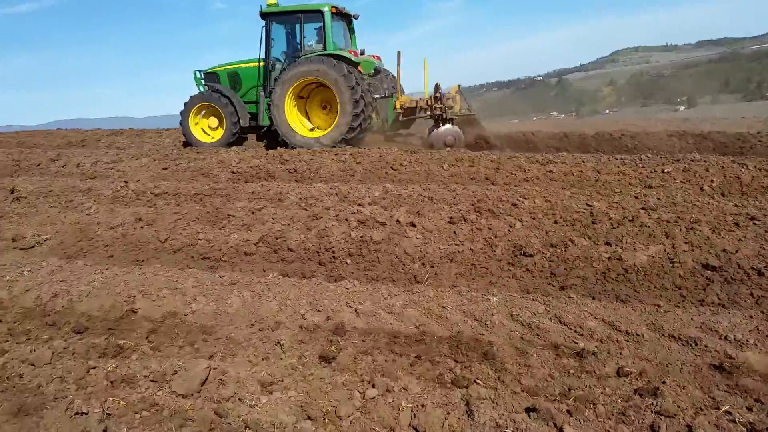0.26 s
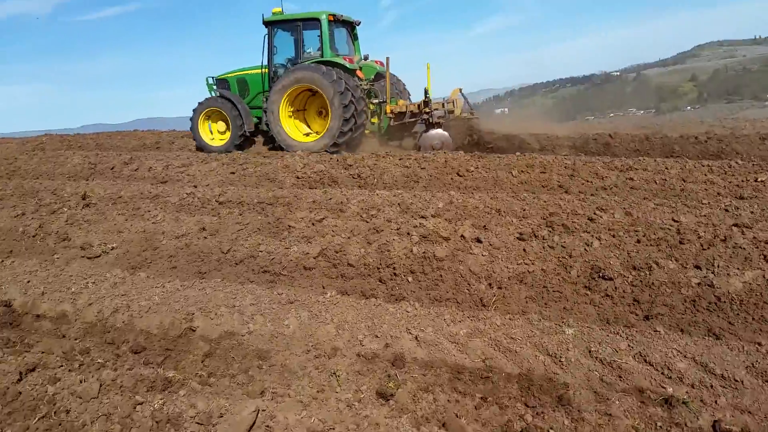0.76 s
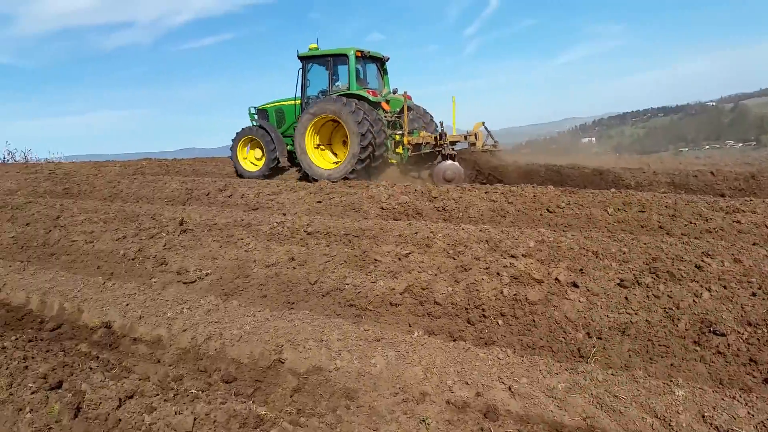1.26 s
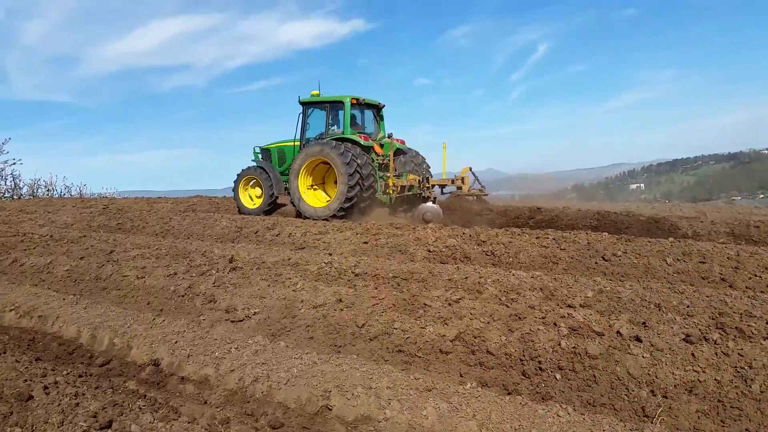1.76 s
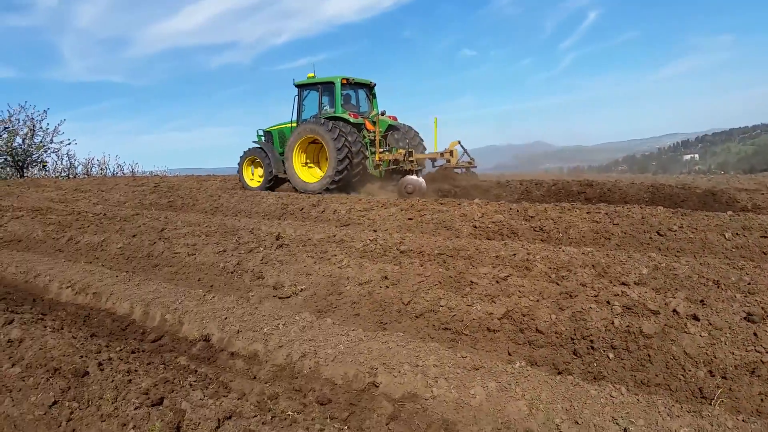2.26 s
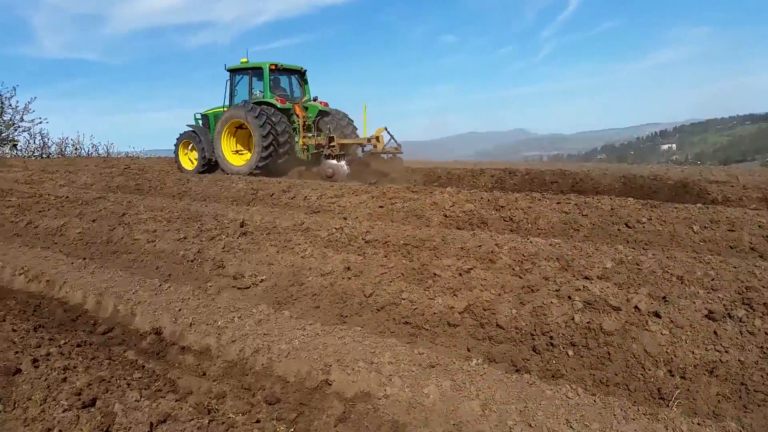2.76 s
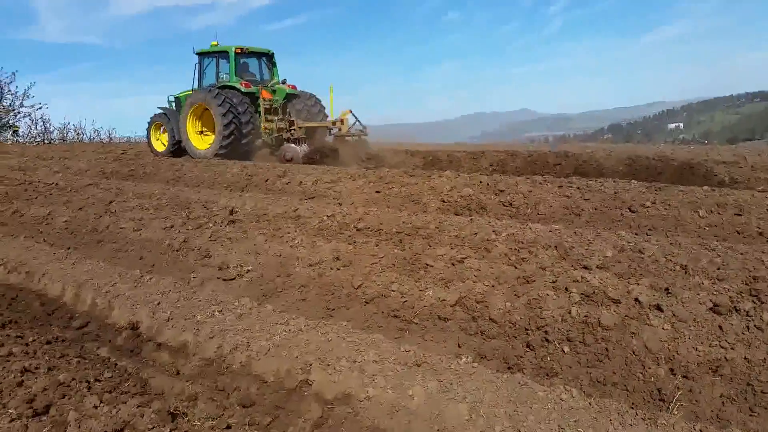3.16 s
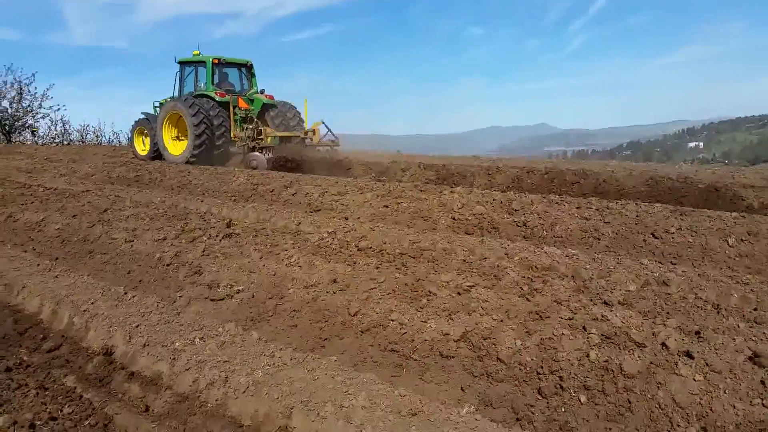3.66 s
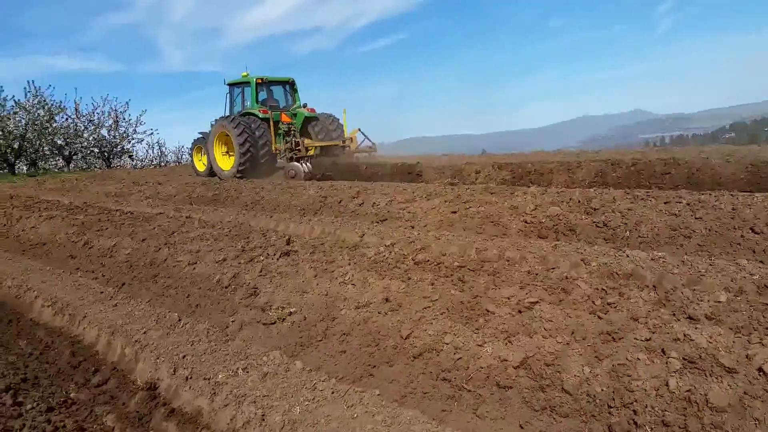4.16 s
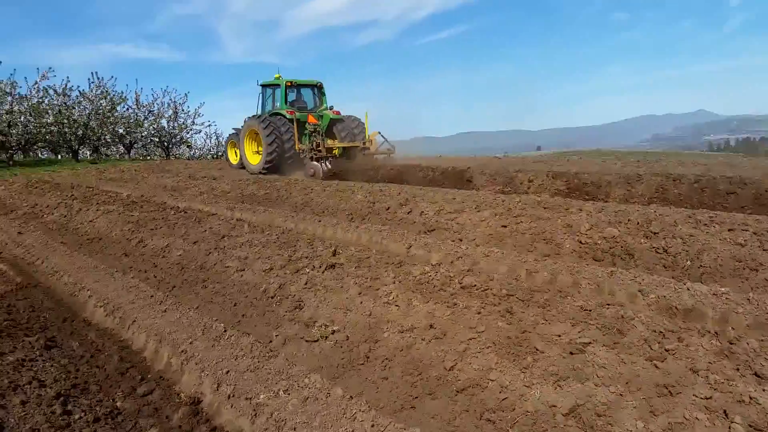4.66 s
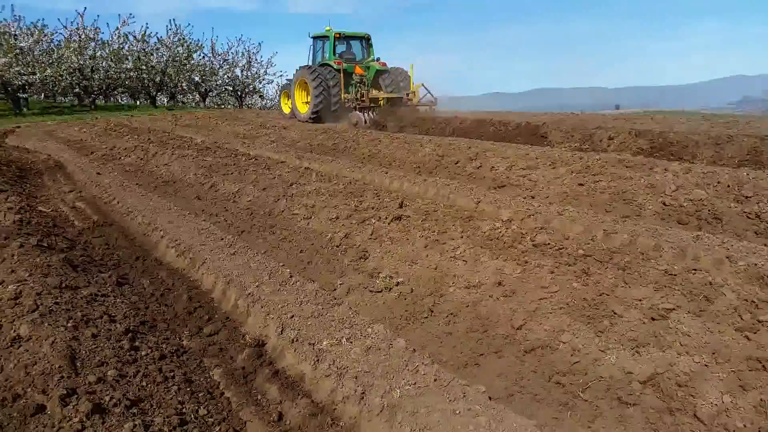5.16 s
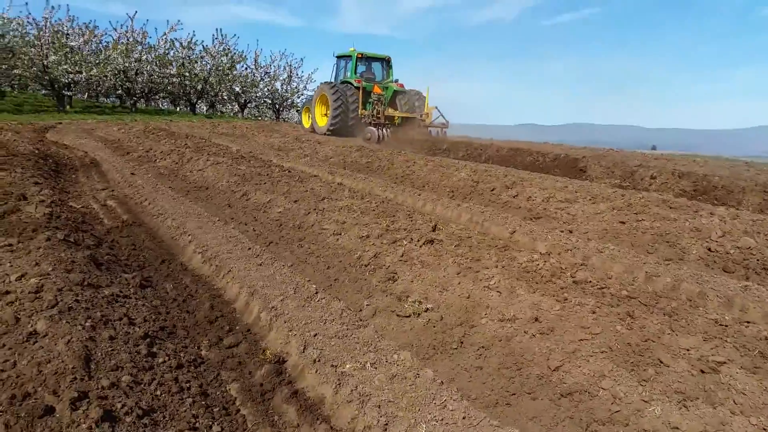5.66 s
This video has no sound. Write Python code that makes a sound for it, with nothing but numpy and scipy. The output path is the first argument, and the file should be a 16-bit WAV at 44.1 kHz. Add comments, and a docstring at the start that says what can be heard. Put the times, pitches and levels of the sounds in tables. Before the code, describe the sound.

Outdoors in an open field, a four-cylinder diesel tractor works steadily, its low exhaust drone pulsing about seventy times a second. Rumble, rough roar and harrow clatter surround it. Gritty knocks of discs on clods or stones cluster between one and three seconds. The stereo microphone stays at a moderate distance as the tractor draws away, growing quieter and duller, its hiss nearly gone.

```python
"""Diesel tractor with a disc harrow

A four-cylinder diesel tractor drags a disc harrow across a field and draws away from a two-port microphone.
Sinusoidal exhaust orders and a gliding hum sound with shaped noise: a low rumble, and roar, clatter and hiss
that throb with each firing. A whistle is a narrow noise band; knocks of a disc on a clod or stone and
bright ticks are short noise bursts, and jolts of the frame are low swells."""
import sys
import numpy as np
from scipy import signal
from scipy.fft import rfft, irfft
from scipy.io import wavfile
from scipy.ndimage import uniform_filter1d

SR = 44100
rng = np.random.default_rng(int(sys.argv[2]) if len(sys.argv) > 2 else 0)


def wav_record(signal):
    """Record a signal, one row per channel, as 16-bit PCM in the file named by sys.argv[1]."""
    frames = np.transpose(np.atleast_2d(signal))
    bounded = np.clip(frames, -1, 1)
    # unit amplitude maps onto the largest positive 16-bit level
    quanta = np.round(bounded * 32767).astype(np.int16)
    wavfile.write(sys.argv[1], SR, quanta)


def magnitude_from_level(level_db):
    """Linear magnitude for a level in decibels (20 dB per decade)."""
    exponent = np.asarray(level_db, float) / 20
    return 10 ** exponent


N = 260631
T = np.arange(N) / SR  # sample times [s]
FRAMES = np.arange(-(-N // 256) + 1) * 256 / SR  # times of the spectral frames [s]
HZ = np.fft.rfftfreq(1024, 1 / SR)  # frequencies of the spectral bins

# Change of level as the machine draws away: (time [s], gain [dB])
AWAY = [(0, -0.5), (.5, -2), (2.1, -3), (3.05, -6), (4.3, -6.5), (4.85, -5), (5.4, -6.5), (5.91, -7)]


def evened(x):
    """Normalization: scales to an rms of 1, judged on the mean of the channels."""
    middle = np.atleast_2d(x).mean(0)
    return x / np.sqrt(np.mean(middle ** 2) + 1e-20)


def curves(rows):
    """Linear interpolation: the columns of a table as curves over time."""
    s, *columns = np.transpose(rows)
    return [np.interp(T, s, c) for c in columns]


def read(points, hz):
    """Interpolation over log frequency: the columns of a table at the frequencies hz."""
    f, *columns = np.transpose(points)
    return np.array([np.interp(np.log(hz + 1), np.log(f + 1), c) for c in columns])


def resonate(x, hz, width):
    """Resonance by heterodyning: shifts hz down to zero, smooths and shifts back, with a peak gain of 1."""
    turn = np.exp(2j * np.pi * np.cumsum(hz * np.ones(N)) / SR)
    r = np.exp(-np.pi * width / SR)
    smooth = signal.lfilter([1 - r], [1, -r], x / turn)
    return 2 * (turn * smooth).real


def at_ports(pair, colour, patchy_db=0, shape_db=0):
    """Interaural coherence: two signals become a partly alike pair, coloured port by port with drifting patches."""
    # Likeness of the two ports: (frequency [Hz], likeness [0-1], phase by which the left port leads [rad])
    ports = [(25, .96, 0), (120, .95, .05), (300, .985, .02), (700, .98, -.16), (880, .84, -.2),
             (1120, .89, .14), (1500, .78, .05), (1900, .58, .7), (2400, .7, 1.05), (3000, .5, 1.8),
             (3650, .45, 2.75), (4400, .5, 3.2), (5300, .2, 4.5), (6500, .35, 5.8), (9600, .1, 8),
             (11600, .22, 10.1), (13000, .35, 10), (15700, .22, 11.6)]
    z = signal.stft(pair, nperseg=1024, noverlap=768)[2]
    same, lead = read(ports, HZ)[:, :, None]
    same = np.clip(same, 0, 1)
    z[1] = (same * z[0] + np.sqrt(1 - same ** 2) * z[1]) * np.exp(-1j * lead)
    patches = rng.standard_normal(z.shape[1:])
    patches = uniform_filter1d(patches, size=3, axis=0)  # narrow in frequency
    patches = uniform_filter1d(patches, size=50, axis=1)  # long in time
    colour_db = read(colour, HZ)[:, :, None]
    z *= magnitude_from_level(colour_db + patchy_db * patches / patches.std() + shape_db)
    return signal.istft(z, nperseg=1024, noverlap=768)[1][:, :N]


def speed():
    """Speed regulation: the governor hunts under load, so the firing rate [Hz] eases between turning points."""
    # Turning points: (time [s], firing rate [Hz])
    turning_points = [(0, 70.), (0.299, 72.12), (.8, 69.48), (1.04, 71.96), (1.349, 67.82), (1.62, 71.2),
                      (1.789, 69.84), (1.95, 71.57), (2.14, 68.8), (2.39, 73.3), (2.65, 69.8),
                      (2.901, 71.6), (3.18, 69.3), (3.37, 71.4), (3.5, 70.37), (4., 70.3), (4.2, 70.9),
                      (4.5, 70.6), (4.72, 70.92), (4.98, 69.86), (5.36, 71.86), (5.65, 71.5), (5.821, 70.4),
                      (5.91, 71.)]
    s, hz = np.transpose(turning_points)
    index = np.arange(len(s))
    place = np.interp(T, s, index)
    eased = place - np.sin(2 * np.pi * place) / (2 * np.pi)
    return np.interp(eased, index, hz)


def puffs(firing, depth_db, lag):
    """Amplitude modulation: noise swells once a firing, more for the strong cylinders."""
    # Strength of the four cylinders in turn [depth_db / 2 times this gives dB]
    cylinders = [1.8, -0.8, 1.8, -1.7]
    strength = np.interp(firing - lag, np.arange(4), cylinders, period=4)
    swell = magnitude_from_level(depth_db * (np.cos(2 * np.pi * (firing - lag)) + strength / 2))
    return swell * rng.standard_normal((2, N))


def exhaust(firing):
    """Fourier series: periodic firing gives orders of its rate, and unequal cylinders add fractional ones."""
    # Exhaust tones as the pipe turns away: (time [s], first order rms [dB], second order rms [dB])
    orders = [(0, -23.5, -22.5), (1., -24, -25), (1.35, -24.8, -24), (2.25, -24.5, -26.5),
              (2.55, -27, -27.5), (3., -27, -32.5), (3.25, -26.5, -37), (3.8, -26.5, -40),
              (4.3, -26, -41.5), (4.55, -26.5, -49.5), (5.05, -26, -36), (5.45, -28, -39), (5.75, -32, -32),
              (5.91, -29, -34)]
    # Weak orders: (time [s], order 1.25 rms [dB], order 5 rms [dB], order 6 rms [dB])
    weak = [(0, -40, -43.5, -67), (0.802, -47, -69, -41), (1.3, -43, -51, -42), (2., -41.5, -54, -49.5),
            (2.8, -43, -48.5, -61), (3.6, -46, -50, -60), (3.95, -50, -45.5, -53), (4.4, -37, -43.5, -58),
            (5.1, -45.5, -51.5, -47), (5.6, -52, -70, -72)]
    # Orders from unequal cylinders: (multiple of the firing rate, level over the first order [dB])
    uneven = [(.5, -34.5), (.75, -34), (1.5, -24.5), (1.75, -23), (2.25, -22.5), (2.5, -24), (4.25, -32.5),
              (7, -30.5), (8, -28)]
    first_db, second_db = curves(orders)
    angle = 2 * np.pi * firing
    tone = magnitude_from_level(first_db) * np.cos(angle) - magnitude_from_level(second_db) * np.sin(2 * angle)
    third = np.cos(3 * angle + 2 * np.pi * rng.random())
    tone += magnitude_from_level(second_db - 13.5) * third  # the third order fades with the second
    for k, db in zip((1.25, 5, 6), curves(weak)):
        tone += magnitude_from_level(db) * np.cos(k * angle + 2 * np.pi * rng.random())
    firing_hz = np.gradient(firing) * SR
    for k, db in uneven:  # these waver, as no two cycles are alike
        wavering = evened(resonate(rng.standard_normal(N), k * firing_hz, 0.73))
        tone += magnitude_from_level(first_db + db) * wavering / np.sqrt(2)
    return np.sqrt(2) * tone  # peak from rms


def hum():
    """Frequency modulation: a sinusoid on its own slow glide, with a phase lead between the ports."""
    # The hum slides against the third order and fades out now and then: (time [s], rms level [dB])
    hum_level = [(0, -26), (.33, -29.5), (.55, -26.5), (1.2, -25.5), (1.8, -25.5), (2.25, -31), (3., -30.5),
                 (3.3, -38), (3.6, -43.5), (3.8, -32.5), (4.2, -29), (4.65, -39), (4.85, -32), (5.05, -35),
                 (5.25, -32), (5.91, -35)]
    # Glide: (time [s], frequency [Hz])
    glide = [(0, 217.6), (1.1, 218), (1.75, 215.5), (2.05, 212.8), (3., 210.6), (5.91, 210.5)]
    # Move to one side: (time [s], phase by which the left port leads [rad])
    hum_lead = [(0, 0.), (2.7, 0), (3.1, 0.18), (5.91, .15)]
    angle = 2 * np.pi * np.cumsum(curves(glide)[0]) / SR
    angle = angle + curves(hum_lead)[0] / 2 * np.array([[1], [-1]])
    return np.sqrt(2) * magnitude_from_level(curves(hum_level)[0]) * np.sin(angle)


def roar(firing):
    """Source and filter: puffs sound broadly and through a body resonance that shifts as the tractor turns away."""
    # Roar spectrum: (frequency [Hz], left level [dB], right level [dB])
    colour = [(204, -20, -26), (273, 0, -0.5), (496, -3, -4), (660, -3, -3.5), (788, -7.5, -9.5),
              (965, -61, -62)]
    # Body resonance: (time [s], level [dB], centre [Hz], width [Hz])
    resonance = [(0, -33.5, 665, 161), (.7, -32.5, 600, 160.4), (1.4, -34.5, 564, 144),
                 (2.1, -44, 575, 148), (2.9, -52.5, 630, 151.5), (3.7, -45, 720, 131), (4.5, -39, 655, 120),
                 (4.9, -42, 630, 125.4), (5.3, -37.5, 640, 100), (5.7, -34, 569, 70),
                 (5.91, -34.5, 564, 60)]
    body_db, hz, width = curves(resonance)
    broad_db = -35 + curves(AWAY)[0]
    broad_db -= 13 * np.maximum(T - 5.47, 0)  # the broad roar sinks at the end, in dB per second
    slip = evened(resonate(rng.standard_normal(N), 0.84, 8.))
    uneven_firing = firing - 0.3 + 0.008 * slip  # firings come a little early or late
    thumps = sum(np.cos(2 * np.pi * k * uneven_firing) for k in range(6, 11))
    drive = puffs(firing, depth_db=1.5, lag=0.27) + 0.045 * thumps
    log_offset = np.log(HZ[:, None] + 1) - np.log(np.interp(FRAMES, T, hz))
    spread = log_offset * np.interp(FRAMES, T, hz / width)
    body_shape_db = np.maximum(-12 * spread ** 2, -60)
    body = at_ports(drive, colour, patchy_db=1.5, shape_db=body_shape_db)
    body *= np.sqrt(150 / width)  # makes up for the smaller power of a narrower band
    broad = at_ports(puffs(firing, depth_db=2.5, lag=0.2), colour, patchy_db=2.0)
    return magnitude_from_level(broad_db) * evened(broad) + magnitude_from_level(body_db) * evened(body)


def rumble():
    """Broadband random excitation: tyres and soil give low noise of unsteady level."""
    # Rumble spectrum: (frequency [Hz], left level [dB], right level [dB])
    colour = [(15, -34.5, -25), (25, -1, 6.5), (45, 1.5, 6.5), (105, 9, 11), (174, 1.5, 7), (257, 3.5, 0),
              (375, -60, -54)]
    low = evened(at_ports(rng.standard_normal((2, N)), colour, patchy_db=3.0))
    low = signal.sosfilt(signal.butter(2, 32., "high", fs=SR, output="sos"), low)  # the deep bass is cut away
    gusts = evened(resonate(rng.standard_normal(N), 3., 9.5))
    return magnitude_from_level(-34 + 0.83 * curves(AWAY)[0] - 0.5 * gusts) * low


def clatter(firing):
    """Frequency-dependent attenuation: throbbing noise of block and discs grows fainter and duller with distance."""
    # Clatter spectrum: (frequency [Hz], left level [dB], right level [dB])
    colour = [(640, -21, -14), (866, -3.5, 1.5), (1000, -2.5, -1), (1570, -4.5, -0.5), (1840, -7, -3.5),
              (2660, -10, -6.5), (3340, -16.5, -10.5), (3930, -11.5, -15.5), (4550, -18.5, -19),
              (5240, -21, -28.5), (6800, -29.5, -50.5), (7900, -39, -57.5), (9600, -50, -56),
              (12000, -67, -57)]
    # Bands that swell for a while:
    # (centre [Hz], width [Hz], peak gain [dB], time of the peak [s], time from the peak to 1/e of the gain [s])
    swells = [(1078, 120, 7, 0.55, .96), (994, 210, 9, 3.53, 0.9), (1080, 120, 4, 5.7, 0.33),
              (1407, 91, 5.5, 2.3, 0.67), (1370, 100, 4.8, 4.3, 1.4), (2054, 88, 3.5, 1.4, 4),
              (2090, 160, 11, 4.68, 0.1), (2780, 230, 4, 0.94, 1.1)]
    away_db = curves(AWAY)[0]
    loss_db = 0.28 * (away_db.mean() - away_db)  # per kHz
    shape_db = -HZ[:, None] / 1000 * np.interp(FRAMES, T, loss_db)
    for hz, width, db, s, lasts in swells:
        rise_and_fall = np.exp(-((FRAMES - s) / lasts) ** 2)
        shape_db += db * rise_and_fall / (1 + (2 * (HZ[:, None] - hz) / width) ** 2)
    noise = puffs(firing, depth_db=0.68, lag=0.33)
    return magnitude_from_level(-36 + away_db) * evened(at_ports(noise, colour, patchy_db=1.68, shape_db=shape_db))


def hiss(firing):
    """Random amplitude modulation: a high noise throbs with the firings and flickers in level."""
    # Hiss spectrum: (frequency [Hz], left level [dB], right level [dB])
    colour = [(7500, -44, -46.5), (10100, -28.5, -38), (10900, -20, -24), (12100, -13, -15.5),
              (13030, -6, -7.5), (14500, -3, -0.5), (15200, -8.5, 0.5), (15900, -10.5, -1)]
    # Course of the hiss before the flicker: (time [s], level [dB])
    hiss_level = [(0, -37), (.3, -33.5), (.5, -33), (.7, -35.5), (1.04, -35), (1.3, -42.5), (2.1, -45.5),
                  (2.6, -46.5), (3.1, -48), (4.3, -51), (4.9, -48), (5.25, -53.5), (5.91, -56)]
    flicker = evened(resonate(rng.standard_normal(N), 9., 16.))
    noise = evened(at_ports(puffs(firing, depth_db=0.9, lag=0.3), colour, patchy_db=0.5))
    return magnitude_from_level(curves(hiss_level)[0] + 1.3 * flicker) * noise


def whistle():
    """Narrow-band noise: two resonances in a row give a fuzzy tone, opposite in sign at the two ports."""
    # Course of the whistle before the port gains: (time [s], level [dB])
    whistle_level = [(0, -65), (1., -50), (1.5, -52), (2.2, -72.5), (5.91, -66)]
    hz, width = 3980, 90  # Hz, Hz
    tone = evened(resonate(resonate(rng.standard_normal(N), hz, width), hz, width))
    return magnitude_from_level(curves(whistle_level)[0]) * tone * np.array([[1.6], [-0.9]])


def left_hiss(firing):
    """Spectral shaping: a band of hiss in the left port alone throbs with the firings."""
    # Relative spectrum of the band: (frequency [Hz], level [dB])
    colour = [(3000, -25), (3900, -6.5), (4700, -0.5), (5200, -7), (5800, -20.5), (6800, -50.5),
              (8000, -58)]
    spectrum = rfft(puffs(firing, depth_db=0.5, lag=0.25)[0])
    band = irfft(spectrum * magnitude_from_level(read(colour, np.fft.rfftfreq(N, 1 / SR))[0]), N)
    return magnitude_from_level(-47) * evened(band) * np.array([[1], [0]])


def blow(s, db, length):
    """Transient envelope: quick rise, hold for the length, and an exponential tail in step with it."""
    age = np.clip(T - s, 0, None)
    rise = 1 - np.exp(-age / 0.0012)
    tail_db = 60 * np.clip(age / length - 1, 0, None) / 7  # 60 dB down over seven lengths
    return rise * magnitude_from_level(db - tail_db)


def knocks():
    """Impact excitation: uneven bursts of crumbling soil also ring the modes of a disc; ticks are bright bursts."""
    # Blows before colouring: (time [s], level [dB], extra treble over 4 kHz [dB],
    # drive of the disc over the blow [dB], length [s])
    blows = [(1.069, -32, -1.5, 6.5, 0.017), (1.133, -37, -2.5, 10, .008), (1.284, -36.5, 5.5, 11.5, 0.014),
             (1.594, -28.5, 6, 12.5, 0.017), (1.792, -32, 9, 4, 0.016), (1.815, -36, -8.5, 11, 0.038),
             (2.049, -41, -9, 27.5, 0.0079), (2.398, -32.5, -13, 14, 0.013),
             (2.631, -33.5, -4.5, 8, 0.0091), (3.55, -38, -3, 11.5, 0.011)]
    # Modes of the disc: (frequency [Hz], gain [dB], time to ring down by 44 dB [s])
    disc = [(1625, -7.5, 0.027), (2077, -1, 0.03), (2200, -1, 0.027), (2430, -3, 0.014), (4550, -17, 0.054)]
    # Sharp ticks before colouring, mostly over 11.5 kHz: (time [s], level [dB], length [s])
    ticks = [(1.59, -24, .02), (1.813, -18.5, 0.038), (2.431, -17.5, .006), (5.687, -22.5, 0.013)]
    # Knock spectrum: (frequency [Hz], left level [dB], right level [dB])
    colour = [(600, -13, -12), (990, -2, 2.5), (2300, -7, -2), (3430, 2, -4), (4800, -0.5, -5),
              (5900, -7, -16), (7500, -18.5, -29), (9400, -25, -24.5), (11400, -16.5, -23),
              (13500, -16.5, -22), (15500, -24.5, -11.5)]
    low, middle, tick, ring = np.zeros((4, N))
    for s, db, treble_db, ring_db, length in blows:
        burst = blow(s, db, length)
        low += burst
        middle += burst * magnitude_from_level(treble_db)
        ring += burst * magnitude_from_level(ring_db)
    for row in ticks:
        tick += blow(*row)
    high = middle + tick
    tick_body = magnitude_from_level(-26.5) * tick  # the faint part of a tick under 11.5 kHz
    low, middle = low + tick_body, middle + tick_body
    roughness = evened(resonate(rng.standard_normal(N), 60., 150.))
    grit = rng.standard_normal((2, N)) * magnitude_from_level(1.8 * roughness)
    under_4k, under_11k5 = [signal.sosfiltfilt(signal.butter(6, hz, fs=SR, output="sos"), grit)
                            for hz in (4000, 11500)]
    crumbs = under_4k * low + (under_11k5 - under_4k) * middle + (grit - under_11k5) * high
    for hz, db, decay in disc:
        crumbs += magnitude_from_level(db) * np.array([resonate(x * ring, hz, 1.63 / decay) for x in grit])
    return at_ports(crumbs, colour)


def thuds():
    """Low-frequency resonance: narrow noise swells briefly as the frame jolts."""
    # Jolts: (time of the peak [s], peak level [dB], time from the peak to 1/e [s])
    jolts = [(1.836, -29.5, 0.066), (3.45, -35, .15)]
    hz, width = 100, 37  # Hz, Hz
    low = evened(resonate(resonate(rng.standard_normal(N), hz, width), hz, width))
    return low * sum(magnitude_from_level(db) * np.exp(-((T - s) / length) ** 2) for s, db, length in jolts)


def scene():
    """Superposition: all sources add at the two ports; the exhaust tones reach both alike."""
    firing = np.cumsum(speed()) / SR  # firings so far
    engine = exhaust(firing) + hum() + roar(firing)
    machinery = rumble() + clatter(firing) + hiss(firing)
    high_bands = whistle() + left_hiss(firing)
    return engine + machinery + high_bands + knocks() + thuds()


def top_cut(x):
    """Nothing passes above the cut-off."""
    return signal.sosfilt(signal.butter(12, 15890, fs=SR, output="sos"), x)


def record(dry):
    """Signal chain: the finished mix is passed on without further change of level."""
    return top_cut(dry)


dry = scene()
out = record(dry)
wav_record(out)
```